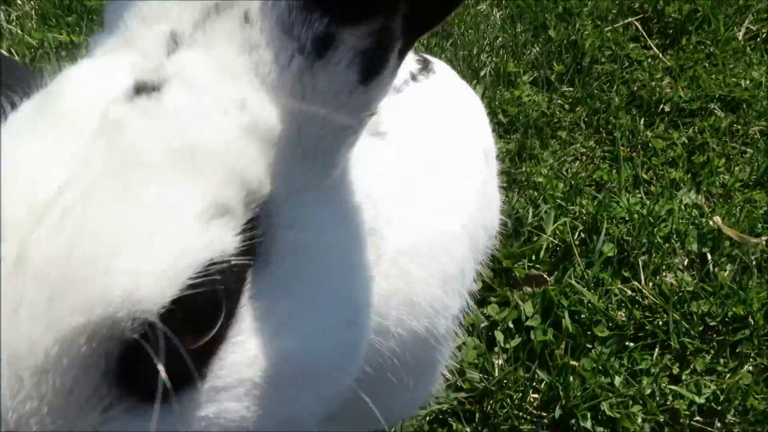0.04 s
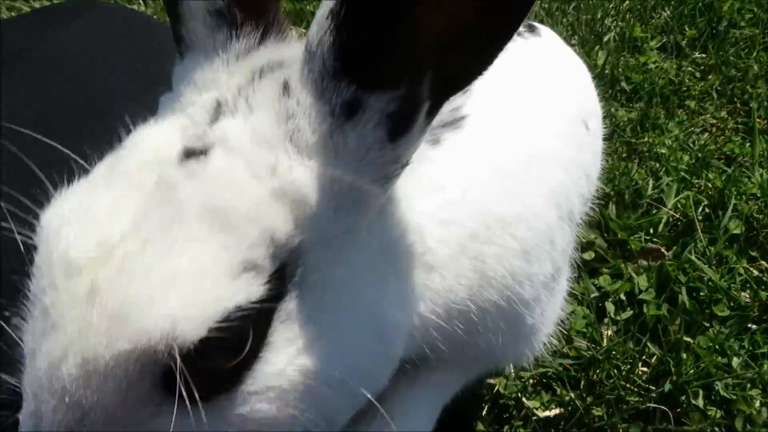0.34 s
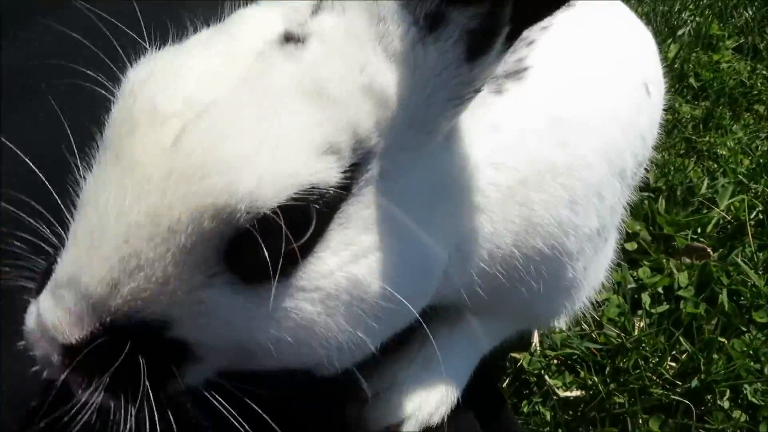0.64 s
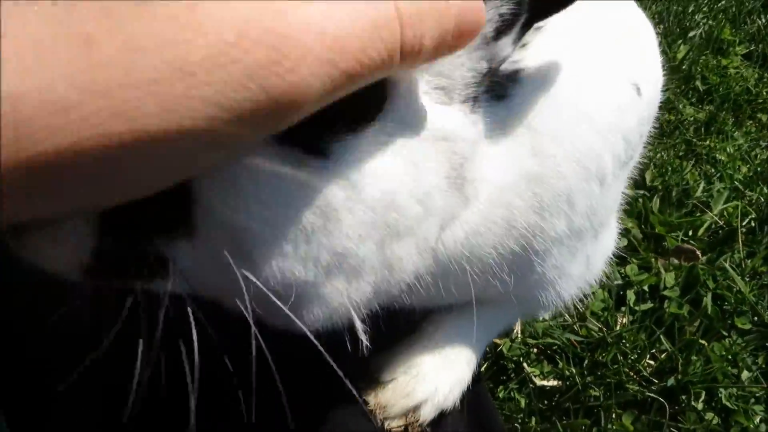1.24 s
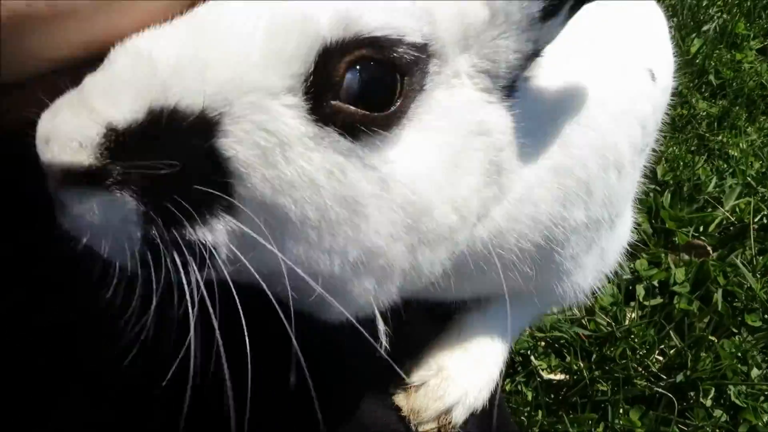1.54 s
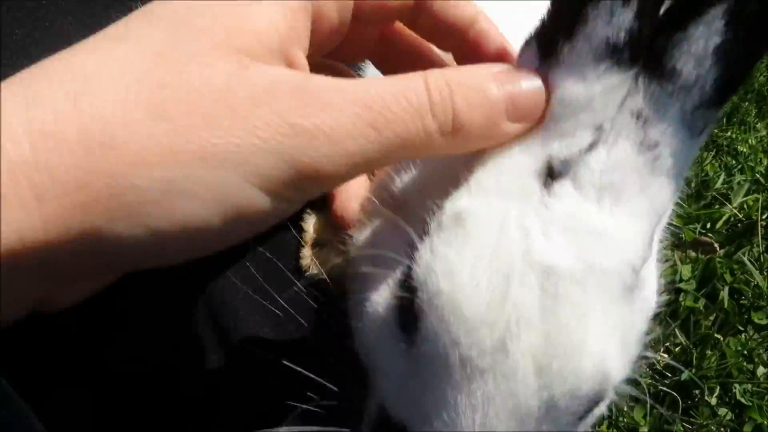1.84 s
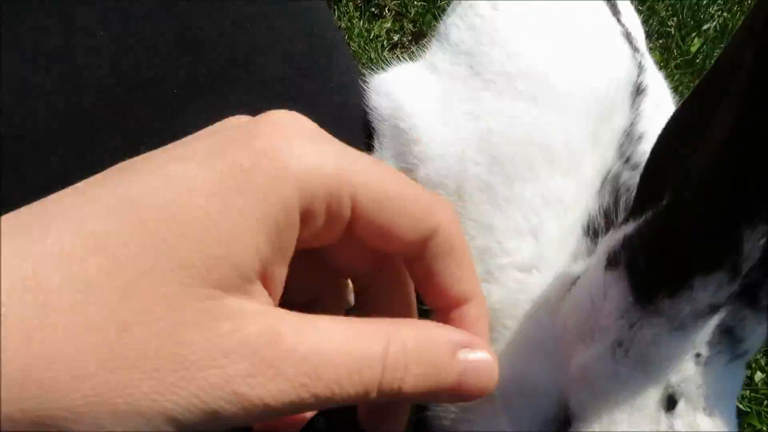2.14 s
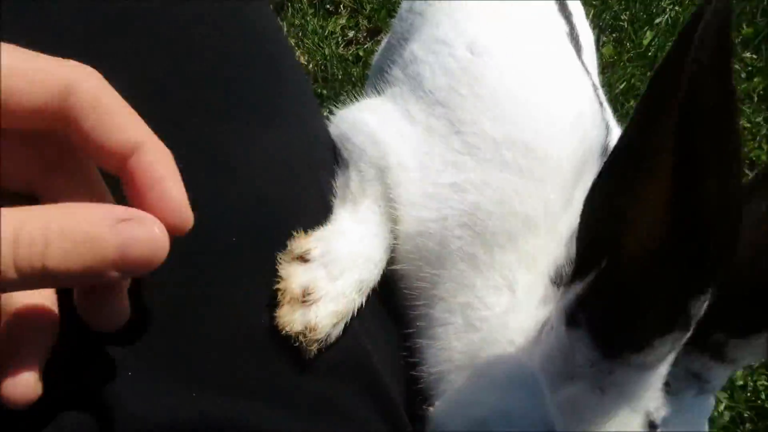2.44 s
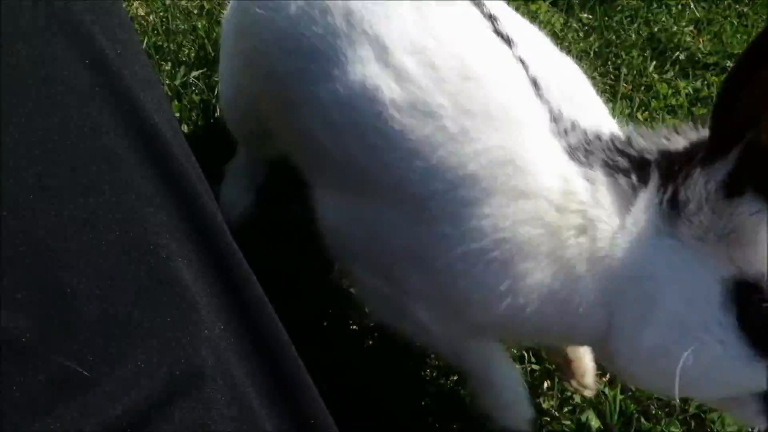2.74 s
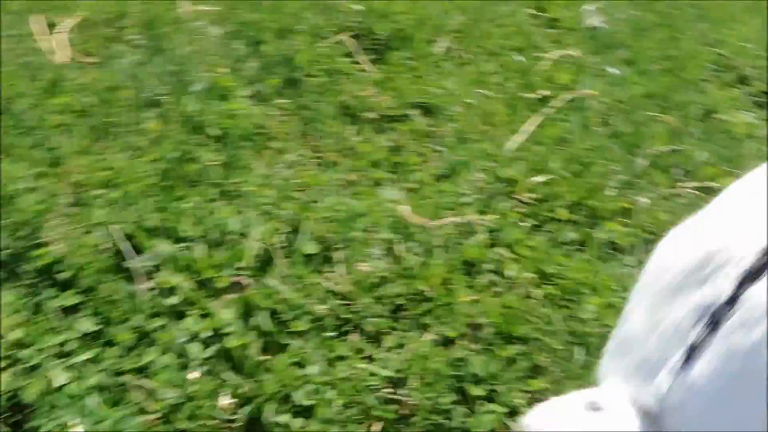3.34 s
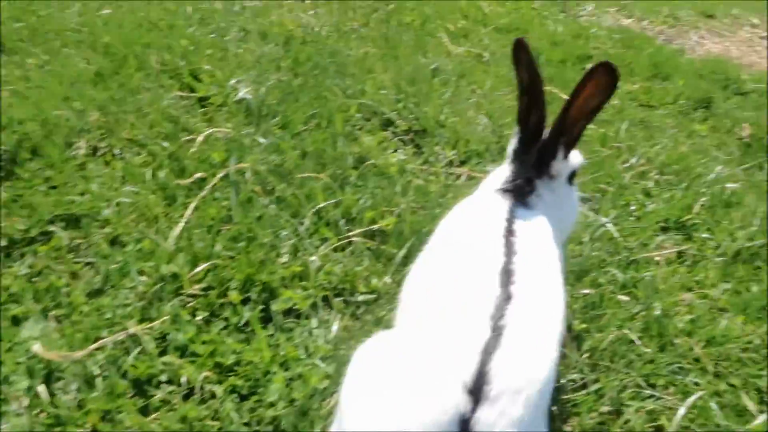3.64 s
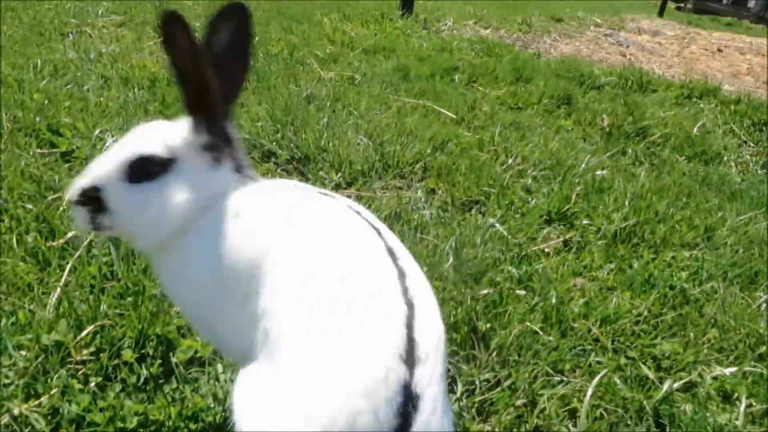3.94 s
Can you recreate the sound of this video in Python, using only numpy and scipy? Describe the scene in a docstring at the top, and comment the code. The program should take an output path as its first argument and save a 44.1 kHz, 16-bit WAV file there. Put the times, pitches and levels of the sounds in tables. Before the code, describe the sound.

Wind bumps the microphone in short, low thumps over a faint hiss of leaves, while a hand softly rustles a rabbit's fur. The gusts strengthen around 2.8 seconds. From 3 seconds the rabbit slides off over trouser cloth with louder rubs, and its claws give a sharp double tick at 3.3 seconds. The strongest gust hits near 3.8 seconds, briefly making everything else quieter.

```python
"""A rabbit is stroked on a lap on a breezy lawn: fur rustles softly over a hiss of distant leaves.
From the start, wind thumps the two ports (sound openings) of a hand-held microphone.
Around 3 s the rabbit slides off over trouser cloth, with louder rubs and a few sharp ticks of claws.
Near the end, the strongest gust drives the limiter, which turns everything down, the hiss included."""
import sys
import numpy as np
from scipy import signal
from scipy.fft import rfft, irfft
from scipy.io import wavfile
from scipy.ndimage import uniform_filter1d, minimum_filter1d

SR = 44100
rng = np.random.default_rng(int(sys.argv[2]) if len(sys.argv) > 2 else 0)


def transcribe(u):
    """Save the signal u as a 16-bit wav file named by the first command-line argument.

    u: samples, shape (n,) or (channels, n), limited to [-1, 1]; the rate is SR.
    q: integer samples, one column per channel.
    """
    v = np.clip(np.atleast_2d(u).T, -1, 1)
    q = np.round(v * 32767).astype(np.int16)
    wavfile.write(sys.argv[1], SR, q)


N = 176400
HZ, T = np.fft.rfftfreq(N, 1 / SR), np.arange(N) / SR

# tone of the low breeze and of the distant leaves: f/Hz, relative level/dB
BREEZE_TONE = [(20, -43), (50, -2), (130, -1), (250, -7), (450, -12.5), (900, -20.5), (2000, -40),
               (16000, -82)]
LEAVES_TONE = [(20, -12), (300, -3), (800, 0.5), (1600, -0.5), (3000, -4), (5000, -8), (8000, -12.5),
               (10500, -15.5), (13000, -24.5), (14500, -52)]
# how alike the outdoor air sounds at the two ports: f/Hz, likeness/0-1
AIR_LIKENESS = [(60, 1), (130, 1), (290, 0.81), (640, 0.05), (1400, 0.4), (3100, 0.73), (6800, 0.32),
                (15000, .1)]
# gusts: peak t/s, half-length/s, level/dB, low edge f/Hz, high edge f/Hz, port difference/0-1
WIND_GUSTS = [(0.042, .03, -44.5, 45, 200, 0.4), (0.099, 0.02, -42, 80, 220, .4),
              (0.221, 0.01, -29, 95, 247, 0.65), (.27, 0.03, -41, 50, 220, 0.44),
              (0.458, 0.018, -23, 70, 228, 1), (.515, .018, -28.5, 60, 200, 0.5),
              (0.598, 0.031, -30, 75, 228, 1), (0.761, 0.011, -31.5, 109, 272, 0.83),
              (0.882, 0.016, -33, 65, 127, 0.6), (0.972, .035, -37.5, 60, 160, 0.6),
              (1.437, 0.01, -39, 190, 450, 0.67), (1.704, 0.017, -35, 121, 233, 0.65),
              (1.771, .012, -29, 64, 193, 0.64), (1.91, 0.018, -37, 55, 170, .4),
              (1.985, 0.024, -36, 60, 179, 0.7), (2.05, 0.016, -37, 85, 210, 0.7),
              (2.13, 0.011, -35, 65, 170, 0.3), (2.225, 0.013, -24, 86, 206, 0.65),
              (2.286, 0.013, -30, 65, 181, .5), (2.312, 0.011, -28, 115, 260, 0.87),
              (2.58, 0.079, -41, 60, 220, 0.7), (2.735, 0.02, -22.5, 80, 301.5, 0.96),
              (2.761, 0.019, -28, 75, 240, 0.8), (2.785, 0.005, -20, 101, 490, 0.7),
              (2.816, 0.0095, -13.5, 94, 326, 0.92), (2.852, 0.018, -31, 70, 230, 0.7),
              (2.986, 0.013, -25.5, 111, 230, 0.9), (3.235, 0.019, -25.5, 70, 220, 0.64),
              (3.263, 0.019, -17.5, 87, 284, 0.9), (3.497, 0.0093, -18, 128, 510, 0.67),
              (3.543, 0.011, -14.5, 115, 300, 0.77), (3.604, 0.016, -19, 105, 310, .8),
              (3.654, 0.0097, -18, 85, 350, 1), (3.683, 0.008, -14.5, 114, 393, 0.94),
              (3.699, 0.0025, -14.5, 150, 560, 0.97), (3.724, 0.011, -9, 110, 422, 1),
              (3.764, 0.013, -2.5, 114, 435, 1), (3.808, 0.012, -6.5, 131, 484, 0.96),
              (3.864, 0.011, -18.5, 240, 630, 0.15), (3.922, 0.022, -14, 236, 620, 0.14),
              (3.947, 0.01, -12.5, 240, 940, 0.13), (3.981, 0.035, -20, 231, 650, 0.12)]
# small whirls of air: t/s, peak level/dB, width/s, delay to the right port/s, left minus right/dB
WIND_EDDIES = [(0.4539, -21, 0.00093, .0006, -3), (0.5195, -13.5, 0.0011, -.0007, 0),
               (0.5262, -10, 0.0017, -.0008, 4), (2.7236, -12, 0.0011, .0002, 0),
               (2.7565, -11.5, .0011, .0008, -4), (2.7831, -12.5, 0.00062, -.0007, -1),
               (2.8213, -7.5, 0.00079, -.0006, -6.5), (2.9867, -6, 0.00054, -.0007, -6),
               (3.253, -8, 0.00093, .0006, -3), (3.542, -3.5, 0.0012, .0005, -2),
               (3.6576, -3.5, 0.00047, .0005, 5.5), (3.6844, -4.5, 0.00097, .0006, -3),
               (3.728, -0.5, .0012, .0006, -4), (3.74, -5, .00045, .0008, 11),
               (3.7558, 3, 0.00039, .0007, 10), (3.7782, 2.5, 0.00048, .0007, 11.5),
               (3.901, -4, 0.00053, 0, -2), (3.947, -1.5, 0.00031, 0, 2)]
# rubs of hand, fur and cloth: peak t/s, half-length/s, level/dB, tilt/dB per octave, left minus right/dB
FUR_RUBS = [(.07, 0.096, -44.5, -2, -1.5), (0.223, 0.057, -50.5, -2.5, 6), (0.321, 0.019, -44.5, 1, 2),
            (1.042, .05, -56, 2, -3), (1.239, 0.097, -49.5, 3, -1), (1.48, 0.12, -44.5, 0.2, 0),
            (1.731, 0.13, -55.5, 11, 1.5), (1.912, 0.058, -50, 3.5, 0), (2.231, 0.19, -49.5, 2, -2),
            (2.511, 0.1, -45.5, .5, -1), (2.691, 0.12, -46.5, -5, 0.5), (2.809, 0.091, -43.5, -2, 0),
            (2.991, 0.04, -44, 3, -2), (3.067, .04, -39, 5.5, 0), (3.15, 0.018, -38, 2, 4),
            (3.205, 0.04, -39, 4, -0.5), (3.264, .035, -43.5, -2, 1), (3.333, 0.041, -37, 2, 0.5),
            (3.411, 0.067, -38, -1, 2), (3.48, 0.035, -35.5, 0, 0), (3.546, 0.036, -35.5, 1.5, -1),
            (3.609, 0.038, -40.5, -1, 0), (3.189, 0.0063, -34, -6, 4), (3.342, 0.0065, -39.5, -11, 5),
            (3.616, 0.004, -36, -7, 0), (3.99, 0.041, -61, 4, -1)]
# tone of a rub: f/Hz, relative level/dB
RUB_TONE = [(20, -23), (300, 2), (900, 1.5), (1700, 2), (3000, 1), (5000, -1), (7500, -3), (10000, -7),
            (12500, -12.5), (13800, -25.5), (14600, -48)]
# how alike a rub sounds at the two ports: f/Hz, likeness/0-1
RUB_LIKENESS = [(300, .2), (700, 0.17), (1400, 0.77), (2600, 0.7), (4400, 0.63), (7000, 0.37),
                (15000, 0.15)]
# ticks of claws and cloth near the microphone:
# t/s, level/dB, decay/s, tilt/dB per octave, left minus right/dB, case ringing/0-1, boosted f/Hz
CLAW_TICKS = [(.0238, -20.5, 0.0015, -3.5, -4, 0.35, 1250), (0.2677, -21.5, 0.00071, -3, -3, 0, 3900),
              (0.296, -26, 0.00096, -4, -1, .1, 4000), (2.9604, -25, 0.0018, -4.5, 7, .15, 4000),
              (3.2803, -1.5, 0.00061, -0.2, -2, 0.95, 5600), (3.2826, -3.5, 0.00087, 1.5, -2, .8, 2050),
              (3.305, -17, 0.001, -2, 11, .2, 1400), (3.309, -25, 0.0054, -1.5, -6, .1, 5200),
              (3.657, -27, .001, -6, 7, 0.3, 2500), (3.756, -27.5, 0.0014, -3.5, 0, .1, 8000),
              (3.902, -34, .0007, 2, 0, .1, 7800), (3.918, -31, 0.00064, 0, -2, .1, 7800)]
# tone of a tick: f/Hz, relative level/dB
TICK_TONE = [(20, -30), (400, -24), (900, 4), (1600, 1), (2700, -6), (4000, -0.5), (5600, -3), (7600, -4.5),
             (10500, -3.5), (13000, -27), (15000, -31)]
# notes at which the camera's case rings: f/Hz, relative level/dB, time to fade by 60 dB/s
CASE_NOTES = [(1380, -18, 0.016), (1853, -11.5, 0.015), (4220, -22, 0.0088), (5500, -19.5, 0.0069),
              (7612, -22, 0.0041)]


def amp(db):
    """Turns decibels into a gain to multiply by."""
    return 10 ** (np.asarray(db) / 20)


def unit(x):
    """Scales a signal to an average strength (rms) of 1."""
    return x / np.sqrt(np.mean(x ** 2) + 1e-20)


def read(points, hz):
    """Reads between a table's rows on a log-frequency axis."""
    f, value = np.transpose(points)
    return np.interp(np.log(hz + 1), np.log(f + 1), value)


def add(mix, start_s, sound):
    """Mixes a stereo sound in, dropping what falls outside the scene."""
    at = round(start_s * SR)
    sound = sound[:, max(-at, 0):]
    part = mix[:, max(at, 0):][:, :sound.shape[1]]
    part += sound[:, :part.shape[1]]


def pan(db):
    """Left and right gains; positive db leans left."""
    return amp([[db / 2], [-db / 2]])


def wander(size, hz):
    """A smooth random wobble of strength 1; higher hz is faster."""
    f = np.fft.rfftfreq(size, 1 / SR)
    return unit(irfft(rfft(rng.standard_normal(size)) * np.exp(-(f / hz) ** 2), size))


def colour(pair, gain, alike):
    """Gives two unrelated noises a tone and makes them partly alike."""
    left, other = rfft(pair)
    alike = np.clip(alike, -1, 1)
    right = alike * left + np.sqrt(1 - alike ** 2) * other
    return unit(irfft(np.array([left, right]) * gain))


def tilted(points, hz, tilt_db):
    """Makes a tone brighter or duller by tilt_db per octave above 700 Hz."""
    return amp(read(points, hz) + tilt_db * np.log2(np.maximum(hz, 700) / 4000))


def outdoor_air(breeze_db=-42.5, leaves_db=-46.5):
    """A low breeze wavers under the even hiss of distant leaves."""
    alike = read(AIR_LIKENESS, HZ)
    breeze = colour(rng.standard_normal((2, N)), amp(read(BREEZE_TONE, HZ)), alike)
    waver_db = 0.74 * wander(N, hz=11)
    leaves = colour(rng.standard_normal((2, N)), amp(read(LEAVES_TONE, HZ)), alike)
    return breeze * amp(breeze_db + waver_db) + leaves * amp(leaves_db)


def gust(s, half, db, low_hz, high_hz, apart, size=16384):
    """A swell of lumpy, swirling air reaches one port just before the other."""
    t, hz = (np.arange(size) - size // 2) / SR, np.fft.rfftfreq(size, 1 / SR) + 1
    low_cut = 1 + (low_hz / hz) ** 3.72  # a higher power makes a steeper edge
    high_cut = 1 + (hz / high_hz) ** 7.24
    gain = 1 / np.sqrt(low_cut * high_cut * (1 + hz / low_hz))
    lag_s = 0.00092 * apart * rng.choice([-1, 1]) * np.array([[-0.5], [0.5]])
    alike = np.exp(-(0.52 * apart * hz / 170) ** 2)  # the ports share the lowest rumble
    flow = colour(rng.standard_normal((2, size)), gain * np.exp(2j * np.pi * hz * lag_s), alike)
    swell = np.exp(-np.abs(t / half) ** 1.88 / 2)
    lumps = amp(2 * wander(size, hz=125))
    return s - size / 2 / SR, amp(db) * unit(flow * swell * lumps) * np.sqrt(np.mean(swell ** 2))


def eddy(s, db, width, lag_s, pan_db, size=2048):
    """A whirl of air thumps both ports: one push, with suction before and after."""
    t = (np.arange(size) - size // 2) / SR
    widths_from_peak = (t - np.array([[0], [lag_s]])) / width
    spread, late = 2.7, 0.5  # breadth and delay of the suction, in widths of the push
    suction = np.exp(-((widths_from_peak - late) / spread) ** 2) / spread
    thump = np.exp(-widths_from_peak ** 2) - suction
    return s - size / 2 / SR, amp(db) * thump / thump.max() * pan(pan_db)


def catching_fibres(pair, bands=7, top_hz=15800, depth_db=1.93):
    """Each pitch band of a rub flickers on its own as different patches of fibre catch."""
    size = pair.shape[1]
    place = (bands - 1) * np.sqrt(np.fft.rfftfreq(size, 1 / SR) / top_hz).clip(0, 1)
    spectrum = rfft(pair)
    parts = [irfft(spectrum * np.maximum(1 - abs(place - k), 0)) for k in range(bands)]
    return sum(part * amp(depth_db * wander(size, hz=35)) for part in parts)


def rub(s, half, db, tilt_db, pan_db, size=32768, slips_per_s=2000):
    """A stroke on fur or cloth: soft hiss and countless tiny slips of fibres swell and fade."""
    t, hz = (np.arange(size) - size // 2) / SR, np.fft.rfftfreq(size, 1 / SR)
    slipping = rng.random(size) < slips_per_s / SR
    slips = slipping * amp(2.5 * np.minimum(rng.exponential(1, size), 4))
    friction = rng.standard_normal((2, size)) * np.hypot(1, 0.45 * unit(slips))
    hiss = colour(catching_fibres(friction), tilted(RUB_TONE, hz, tilt_db), read(RUB_LIKENESS, hz))
    swell = np.exp(-(t / half) ** 2 / 2)
    waver_db = 0.73 * wander(size, hz=40)
    return s - size / 2 / SR, hiss * swell * amp(db + waver_db) * pan(pan_db)


def tick(s, db, decay, tilt_db, pan_db, rings, boost_hz, size=4096):
    """A tiny scrape of claw or cloth briefly rings the camera's case."""
    since, hz = (np.arange(size) - size // 8) / SR, np.fft.rfftfreq(size, 1 / SR)
    t = np.maximum(since, 0)
    fade = (since >= 0) * np.exp(-t / decay)
    octaves_away = np.log2((hz + 1) / boost_hz)
    boost_db = 6.5 * np.exp(-(octaves_away / 0.43) ** 2)
    tone = amp(boost_db) * tilted(TICK_TONE, hz, tilt_db)
    scrape = colour(rng.standard_normal((2, size)) * fade, tone, alike=0.31)
    scrape *= np.sqrt(np.mean(fade ** 2))
    ring = sum(amp(level + tilt_db * np.log2(f / 4000) - 60 * t / fade_s) * np.sin(2 * np.pi * f * t)
               for f, level, fade_s in CASE_NOTES)
    return s + since[0], amp(db) * (0.7 * scrape + rings * ring) * pan(pan_db)


def scene():
    """Outdoor air, wind on the ports, then the rabbit's rubs and ticks on top."""
    mix = outdoor_air()
    for source, table in (gust, WIND_GUSTS), (eddy, WIND_EDDIES), (rub, FUR_RUBS), (tick, CLAW_TICKS):
        for row in table:
            add(mix, *source(*row))
    return mix


def record(dry, limit_db=-11.5, recover_db_per_s=30, top_hz=15800):
    """A limiter turns loud moments down and slowly lets go; the highest treble is cut off."""
    power = uniform_filter1d((dry ** 2).mean(0), size=900)
    power_db = 10 * np.log10(abs(power) + 1e-12)
    fall_db = T * recover_db_per_s
    held_db = np.maximum.accumulate(power_db + fall_db) - fall_db  # jumps up, sinks slowly
    over_db = np.maximum(held_db - limit_db, 0)
    limited = dry / amp(uniform_filter1d(over_db, size=300))
    peak_gain = minimum_filter1d(1 / np.maximum(abs(limited).max(0), 1), size=301)
    limited *= uniform_filter1d(peak_gain, size=301)  # keeps sharp peaks within full scale
    treble_cut = signal.firwin(511, top_hz, window=("kaiser", 9), fs=SR)
    return signal.oaconvolve(limited, treble_cut[None], "same")


dry = scene()
out = record(dry)
transcribe(out)
```